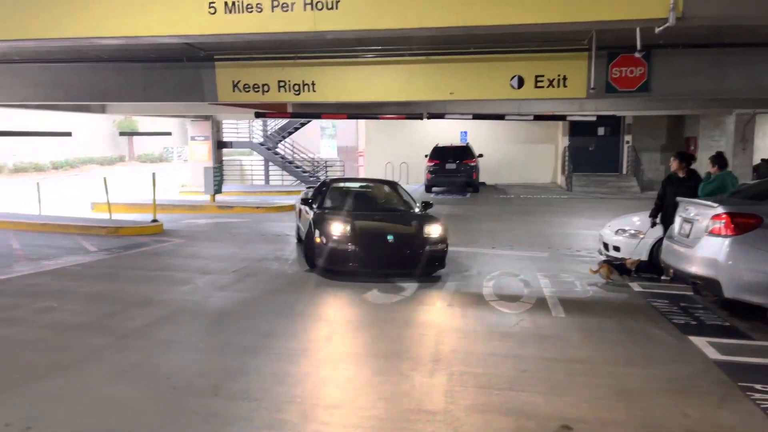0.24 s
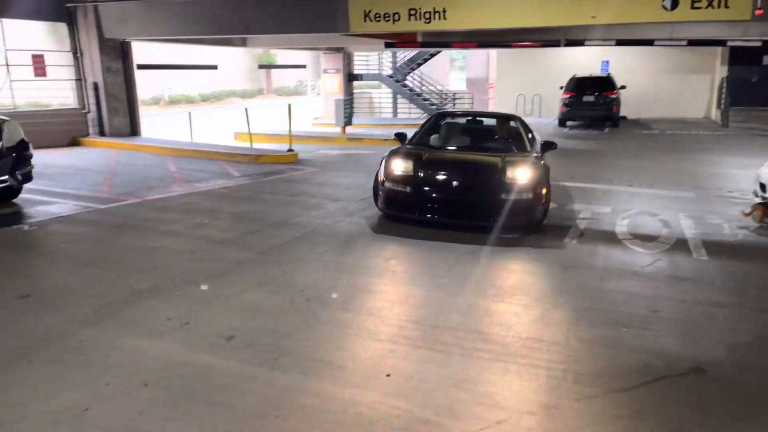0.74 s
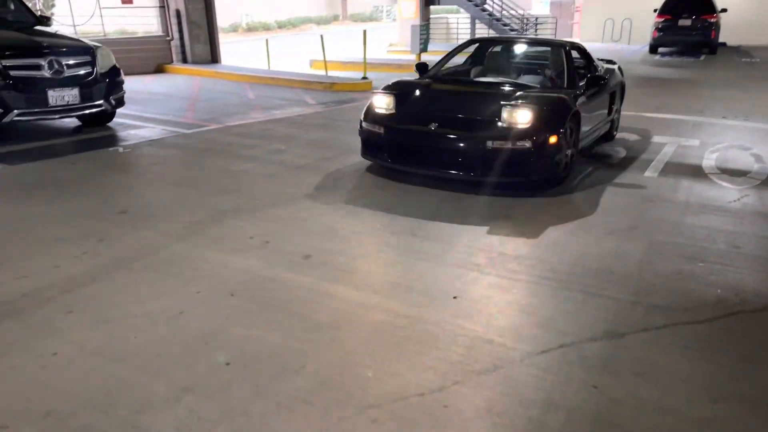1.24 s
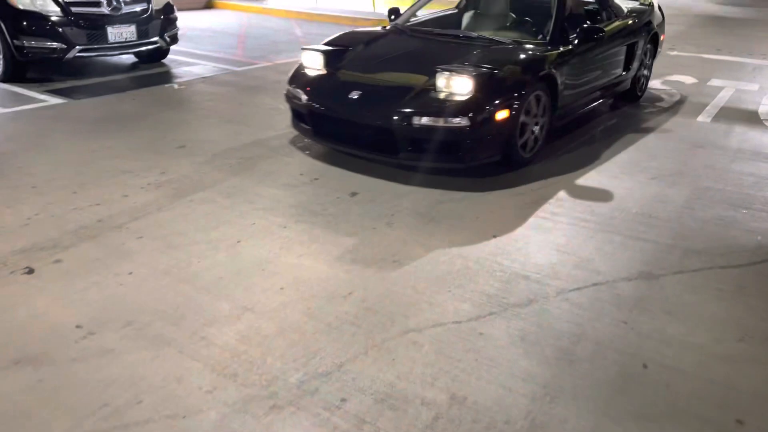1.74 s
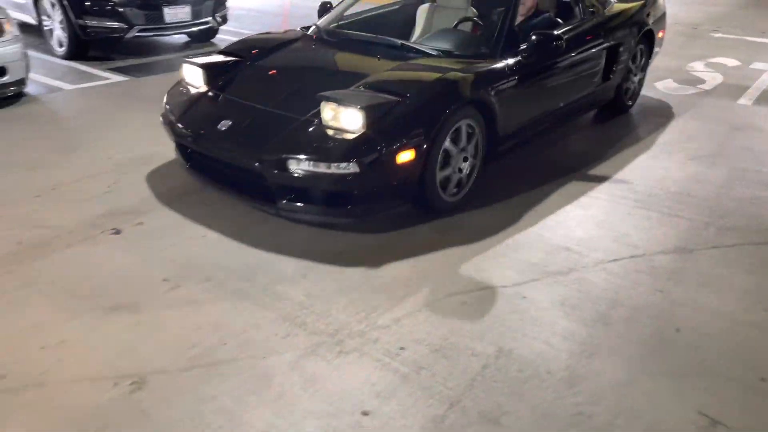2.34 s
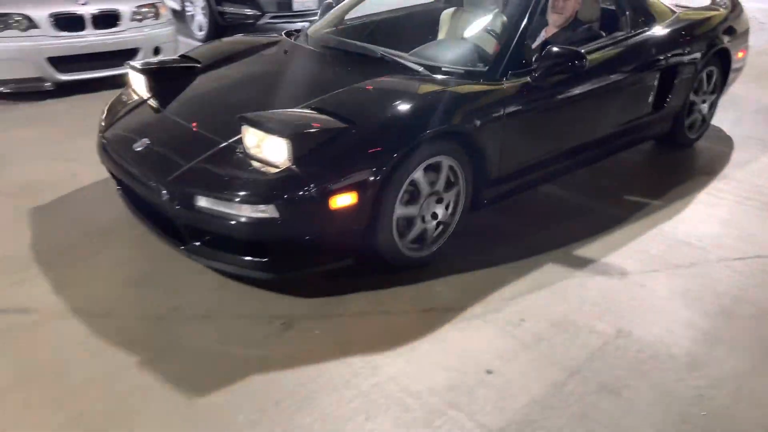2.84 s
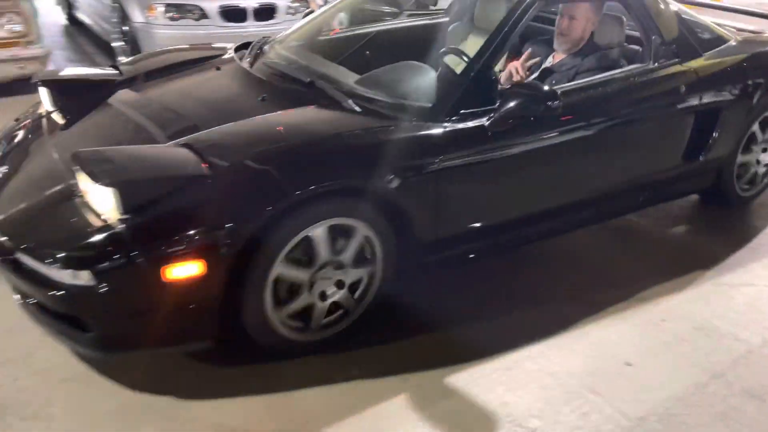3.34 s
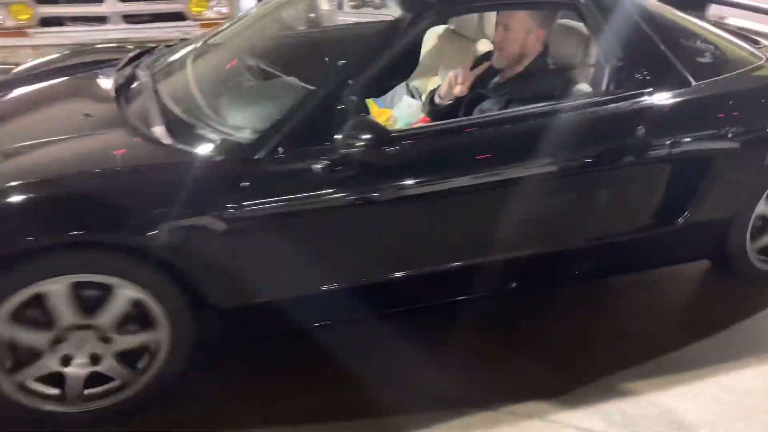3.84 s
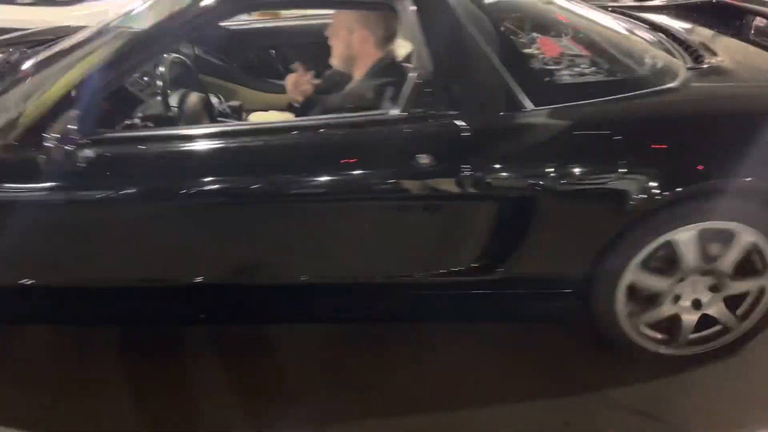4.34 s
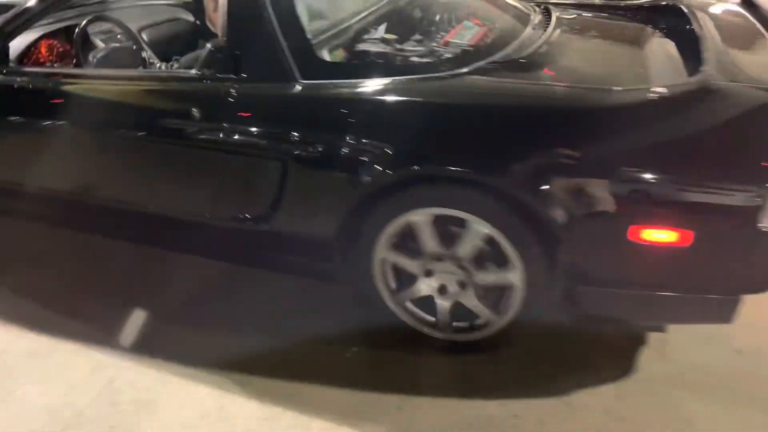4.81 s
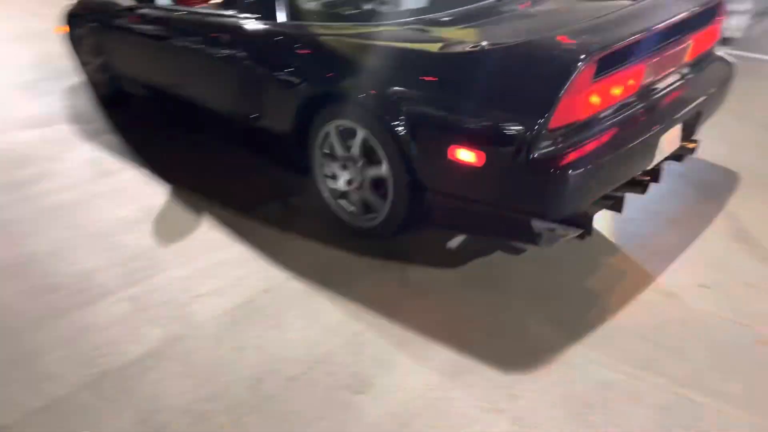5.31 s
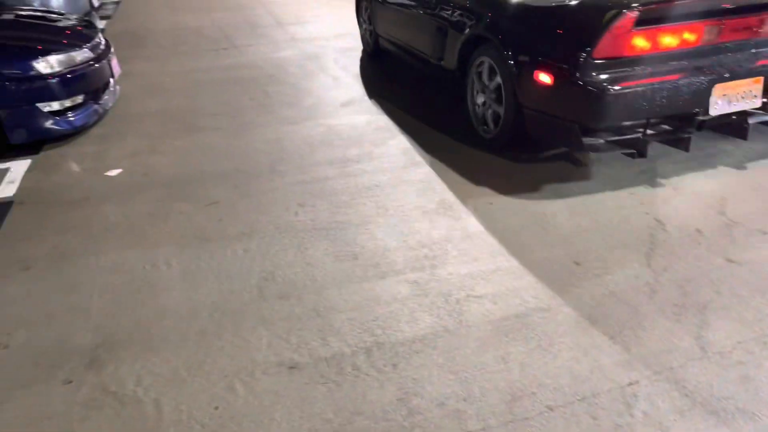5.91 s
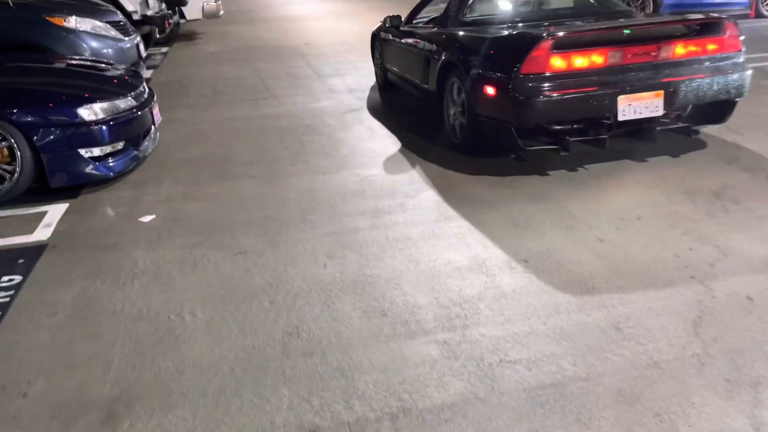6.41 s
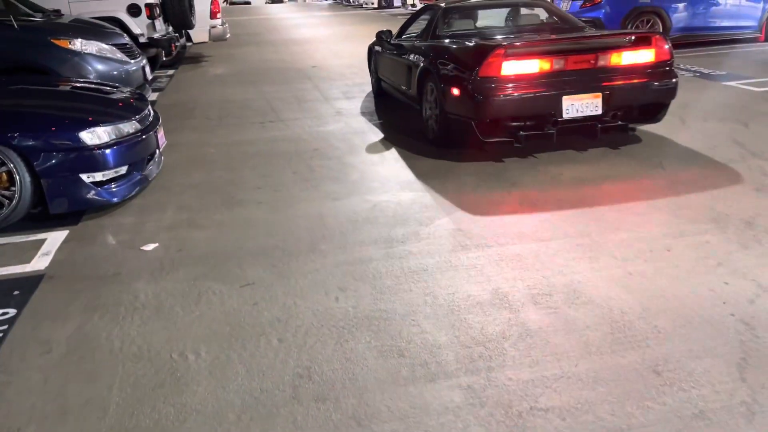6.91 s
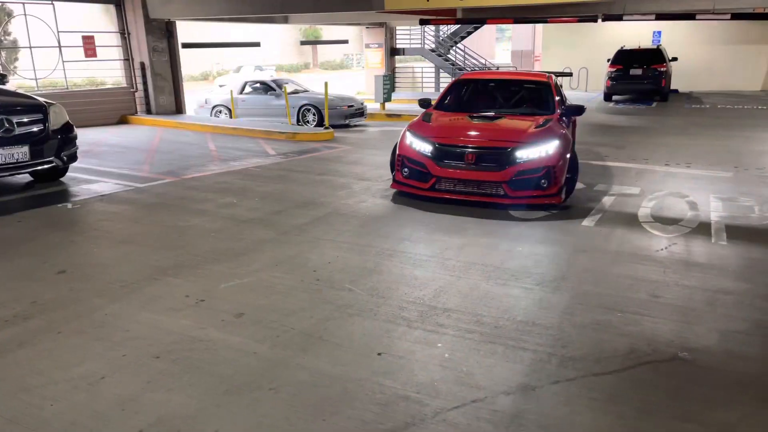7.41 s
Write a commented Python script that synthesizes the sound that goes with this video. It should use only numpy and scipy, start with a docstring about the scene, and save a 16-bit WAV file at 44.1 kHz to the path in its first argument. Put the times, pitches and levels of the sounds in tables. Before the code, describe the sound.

In a concrete parking garage, several engines idle with a low wavering drone. A dull scuff sounds far off early on. A sports car creeps closer, its deep exhaust swelling beside the microphone, tyres hissing softly, then throbs harder as it pulls away. The sound snaps off with a click, and after a tiny gap a second, fainter engine fades in.

```python
"""Concrete parking garage: a low sports car rolls slowly past while parked engines idle all around.
Sine notes drone and surge in the bass; uneven firings knock on pipe resonances and fill the garage.
Banded noise makes the roar and hiss of engine, tyres and air, and a dull scuff sounds far off early on.
Near the end the sound breaks off with a click; after a short silence a second car fades in, fainter,
with broad noise resonances in its roar."""
import sys
import numpy as np
from scipy import signal
from scipy.fft import rfft, irfft, next_fast_len
from scipy.io import wavfile

SR = 44100
rng = np.random.default_rng(int(sys.argv[2]) if len(sys.argv) > 2 else 0)


def int16_out(signal):
    """Quantize to a 16-bit WAV file."""
    q = np.round(np.clip(np.atleast_2d(signal).T, -1, 1) * 32767)
    wavfile.write(sys.argv[1], SR, q.astype(np.int16))


N = 337806
T = np.arange(N) / SR


def from_db(db):
    """Decibels to gain."""
    return 10 ** (np.asarray(db) / 20)


def rms_one(x):
    """Scale to unit rms."""
    return x / np.sqrt(np.mean(x ** 2) + 1e-20)


def in_time(rows):
    """Draw every column of a breakpoint curve, sample by sample."""
    s, *columns = np.transpose(rows)
    return [np.interp(T, s, c) for c in columns]


def at_hz(points, hz):
    """Read a spectrum on a log-frequency axis."""
    table_hz, level_db = np.array(points).T
    return np.interp(np.log(hz), np.log(table_hz), level_db)


def drift(rate):
    """Smooth random modulation with rms 1, about rate changes a second."""
    step = 40  # samples between the points of the slow curve
    r = np.exp(-2 * np.pi * rate * step / SR)
    slow = signal.lfilter([1], [1, -2 * r, r * r], rng.standard_normal(N // step + 2002))
    slow = rms_one(slow[2000:])  # leave out the filter's settling
    return np.interp(np.arange(N) / step, np.arange(len(slow)), slow)


def tone(hz, db):
    """A sine of given rms level that follows its pitch, from a random phase."""
    cycles = np.cumsum(hz) / SR + rng.random()
    return np.sqrt(2) * from_db(db) * np.sin(2 * np.pi * cycles)


def resonance(x, hz, width):
    """Two-pole resonance, gain 1 at its peak."""
    r = np.exp(-np.pi * width / SR)
    poles = [1, -2 * r * np.cos(2 * np.pi * hz / SR), r * r]
    return signal.lfilter([(1 - r * r) / 2, 0, (r * r - 1) / 2], poles, x + 1e-18)


# Stereo balance of the exhausts: one row each for left and right [gain]
BASS_LEAN = np.array([[1.05], [.95]])


def ports(note):
    """Reflections give a note a slightly different phase left and right: the left lag drifts."""
    lag = np.round(15 + 7 * drift(1.9)).astype(int)  # samples
    left = note[np.clip(np.arange(N) - lag, 0, N - 1)]
    return [left, note] * BASS_LEAN


OVERTONE_DB = -24    # octave, relative to its note
WAVER_AT_HZ = 130    # flutter is scaled by pitch relative to this


def order(hz, db, flutter_hz, flutter_db):
    """One engine order with a faint octave above it; higher notes flutter more."""
    share = hz / WAVER_AT_HZ
    hz = hz + share * flutter_hz
    db = db + share * flutter_db
    return tone(hz, db) + tone(2 * hz, db + OVERTONE_DB)


# Steady hum of a parked engine: f/Hz, level/dB before fade and waver
HUM = [(203.5, -39.5), (267.5, -42.5)]
# Fade of the hum, down while the car is close: t/s, level/dB
HUM_FADE = [(0, 1), (2.6, -1), (3.5, -9), (7.66, 0)]


def hum():
    """Idling sine lines whose pitch and level waver a little."""
    fade_db, = in_time(HUM_FADE)
    return sum(tone(hz + .8 * drift(4), db + fade_db + 2.4 * drift(7)) for hz, db in HUM)


# Steady exhaust notes of the engines around: f/Hz, level/dB before swell
DRONES = [(59, -35.5), (79, -36), (103, -35), (124, -37), (147, -36), (177, -41.5)]
DRONE_FOLLOWS = 0.25                          # share of the throb's level swing, in dB
SWELL_DB, SWELLS_PER_S, WANDER_HZ = 3, 3, 0.889   # rms swell, its rate, rms pitch drift


def drones(throb_db):
    """Exhaust sines that swell at random, drift in pitch and partly follow the throb."""
    out = np.zeros((2, N))
    swing_db = DRONE_FOLLOWS * (throb_db - throb_db.mean())
    for hz, db in DRONES:
        level_db = db + swing_db + SWELL_DB * drift(SWELLS_PER_S)
        out += ports(tone(hz + WANDER_HZ * drift(1.11), level_db))
    return out


THUD_S, THUD_RISE_S = .925, .004   # onset, rise time constant
# Bands of the dull scuff far off: lower f/Hz, upper f/Hz, noise level/dB before filtering, t60/s
THUD = [(300, 600, -19.5, 1.1), (600, 1200, -28.5, 1.0), (1500, 4300, -40.5, .5)]


def thud():
    """A dull burst of band-passed noise that dies away in the garage, the treble first."""
    out = np.zeros((2, N))
    age = np.maximum(T - THUD_S, 0)
    rise = 1 - np.exp(-age / THUD_RISE_S)
    for low_hz, high_hz, db, t60 in THUD:
        burst = rng.standard_normal((2, N)) * rise * from_db(db - 60 * age / t60)
        band = signal.butter(3, [low_hz, high_hz], "band", fs=SR, output="sos")
        out += signal.sosfilt(band, burst)
    return out


BREAK_S, RETURN_S = 7.0711, 7.131   # start and end of the silence
# Broad rings in the second car's roar: f/Hz, width/Hz of each of two passes, level/dB
SECOND_BODY = [(455, 30, -48), (786, 110, -50), (974, 50, -59)]


def second_car():
    """White noise coloured by a few broad resonances, heard only after the silence."""
    rings = np.zeros((2, N))
    for hz, width, db in SECOND_BODY:
        white = rng.standard_normal((2, N))
        ring = resonance(resonance(white, hz, width), hz, width)
        rings += from_db(db) * rms_one(ring)
    return rings * (T > RETURN_S)


# Brief pipe and tyre tones: start t/s, length/s, f/Hz, level/dB at the top of the arch, rms pitch spread/Hz
TONES = [(0, 1.0, 455.5, -46.5, 12), (0, .47, 290.7, -41.5, 5.3), (3.4, .58, 245.9, -41.5, 3.6),
         (3.9, .3, 282, -36, 4), (4.24, .45, 315, -33.5, 5), (4.45, .3, 203, -34, 3),
         (4.5, .24, 352, -40, 5), (4.6, .52, 410.5, -42.5, 12), (4.72, .45, 240, -39, 5),
         (4.83, .5, 323, -33.5, 5), (4.8, .62, 451, -37, 9), (5.26, .2, 294, -37, 4),
         (5.4, .4, 336, -38.5, 7), (5.45, .45, 446, -40.5, 9), (5.712, .064, 1446, -50, 10),
         (5.9, .61, 204.8, -36, 2.4), (6.17, .3, 286, -33, 5), (6.86, .24, 268.5, -28, 3),
         (7.03, .07, 1345, -44, 15), (6.13, .2, 208, -29, 3)]


def brief_tones(rough_db):
    """Sines that each swell and fade in one arch; the longer ones flutter more in level."""
    out = np.zeros(N)
    for start, length, hz, db, spread in TONES:
        arch = np.sin(np.pi * np.clip((T - start) / length, 0, 1))
        flutter_db = rough_db * min(2 * length, 1) * drift(30)
        out += arch * tone(hz + spread * drift(14.4), db + flutter_db)
    return out


# Spectrum of the garage roar, centre: f/Hz, relative level/dB per Hz
ROAR = [(12, -36), (25, -29), (38, -26.5), (48, -11), (86, -9.5), (134, -6), (227, -20), (460, -28.5),
        (540, -33), (1000, -39.5), (1400, -48), (2400, -48), (3650, -53), (4300, -58.5), (4900, -62.5),
        (7600, -58), (8300, -65.5), (8800, -81.5), (9500, -82), (10000, -68.5), (11800, -68.5),
        (13400, -73.5)]
# Spectrum of its left-minus-right part, before SIDE_DB: f/Hz, relative level/dB per Hz
ROAR_SIDE = [(20, -62.5), (36, -38.5), (48, -18), (138, -16.5), (233, -14), (327, -16.5), (524, -21),
             (1200, -30), (2890, -40), (5560, -50.5), (8240, -49), (10200, -56), (10900, -94.5),
             (13400, -85.5)]
# Stereo lean of the roar: f/Hz, left over right level/dB
LEAN = [(60, 1.9), (360, 1.5), (650, -1.5), (1180, 1), (2140, 5), (3880, 5), (7040, 0), (12800, 0)]
ROAR_DB, SIDE_DB = -7.5, -11.5   # roar over the mean throb curve; side trim


def roar(car_db, patchy_db):
    """Diffuse engine, tyre and air noise in half-octave bands; each follows the car and flickers."""
    size = next_fast_len(N)
    hz = np.arange(1, size // 2 + 2) * SR / size
    white = rfft(rng.standard_normal((2, size)))
    white *= from_db([at_hz(ROAR, hz), at_hz(ROAR_SIDE, hz) + SIDE_DB])
    white /= np.sqrt(2 * np.sum(np.abs(white[0]) ** 2)) / size  # centre to unit rms
    swings_db = np.array([v - np.mean(v) for v in car_db])
    out = np.zeros((2, N))
    together = drift(4.6)
    for centre in 20 * 2 ** np.arange(0, 10, .5):
        mask = np.cos(np.pi / 2 * np.clip(2 * np.log2(hz / centre), -1, 1)) ** 2
        mid, side = irfft(white * mask, size)[:, :N]
        # blend the two level curves whose home pitches lie around this band
        place = np.interp(np.log(centre), np.log([130, 330, 800, 2500, 8000]), np.arange(5))
        follow_db = np.clip(1 - np.abs(place - np.arange(5)), 0, 1) @ swings_db
        gain = from_db(follow_db + patchy_db * (0.4 * together + drift(26)))
        lean = from_db(at_hz(LEAN, centre) / 2 * np.array([[1], [-1]]))
        out += gain * np.array([mid + side, mid - side]) * lean
    return out * from_db(np.mean(car_db[0]) + ROAR_DB)


# Bass notes that surge and sink back: start t/s, length/s, start f/Hz, end f/Hz, level/dB before flutter
SURGES = [(-.15, 0.36, 146.5, 145.5, -24), (.18, 0.2, 77.7, 80, -25.5), (.38, 0.4, 122.8, 126.6, -27.5),
          (.46, .22, 78, 76, -31), (.6, .25, 128, 124, -28), (.9, 0.2, 52, 57, -28.5),
          (1.04, .24, 127, 130.6, -24), (1.17, 0.23, 59.4, 60.6, -31), (1.48, 0.15, 127, 125, -31.5),
          (1.52, .16, 103, 102, -29), (1.7, 0.24, 102.5, 102.3, -24.5), (.25, .4, 151, 150, -31),
          (2.02, .42, 145, 146, -25.5), (2.15, 0.4, 62.5, 61, -31.5), (2.61, .84, 59.5, 61.5, -19.5),
          (3.14, .18, 68, 68, -24), (2.3, .7, 178, 177, -36), (2.4, .3, 139, 139, -29),
          (2.66, 0.16, 123, 117.8, -26), (2.68, 0.19, 87.5, 90, -30), (2.8, 0.55, 138.5, 140.5, -21.5),
          (3.08, 0.31, 91.7, 97, -27), (3.2, 0.24, 108, 108, -26), (3.32, .26, 147, 147, -19.5),
          (3.53, 0.4, 146, 142.5, -14.5), (3.45, 0.44, 98.4, 94, -28), (3.66, .26, 47.4, 48, -26.5),
          (3.6, 0.28, 193, 194, -29), (4.2, 0.3, 112, 107, -25), (4.56, .34, 104, 104, -25),
          (4.08, .5, 127, 132, -23), (4.36, 0.7, 56, 58, -18.5), (5.02, .2, 58, 58, -27),
          (4.85, 0.41, 187.6, 182.4, -29.5), (4.96, 0.22, 128.5, 126.7, -18), (5.08, 0.28, 93, 91, -27.5),
          (5.34, .26, 129.5, 128, -13), (5.6, 0.48, 129.5, 123.5, -21.5), (5.76, .36, 82, 83, -26),
          (5.7, 0.99, 179, 177.4, -31.5), (5.8, 0.3, 65, 62.5, -24), (6.13, 0.2, 63.5, 65, -17),
          (6.36, 0.22, 67, 65, -15.5), (6.16, 0.5, 105, 109.5, -19), (6.66, .44, 106.5, 106, -20),
          (6.42, .26, 98, 98, -23), (6.16, 0.16, 120.7, 116.7, -22), (6.14, .42, 142.5, 130.5, -14.5),
          (6.5, .28, 138, 147, -16), (6.56, 0.36, 122, 120.5, -14.5), (6.84, .3, 120, 121.5, -18),
          (6.78, 0.28, 83.5, 82.5, -20), (6.62, 0.17, 69, 70, -20), (6.34, .16, 174, 180, -24),
          (6.6, .3, 198, 205, -30), (6.8, 0.2, 138, 139, -19), (6.92, .2, 149, 151, -23),
          (6.86, .3, 168, 167.3, -20), (7.15, 0.3, 126.5, 123, -27.5), (7.2, .16, 106, 106, -28),
          (7.2, 0.2, 166, 166.4, -29.5), (7.44, 0.3, 123.5, 123, -23)]
SURGE_EDGE, LONGEST_EDGE_S = 0.24, 0.091   # share of the length rising, and again falling; its limit


def surges(waver_hz, waver_db):
    """Gliding engine orders rise out of the rumble; four voices share their flutter."""
    wavers = [(waver_hz * drift(10.0), waver_db * drift(20)) for _ in range(4)]
    voices = np.zeros((4, N))
    for k, (start, length, from_hz, to_hz, db) in enumerate(SURGES):
        part = (T - start) / length
        on = (part > 0) & (part < 1)
        part = part[on]
        edge = min(SURGE_EDGE, LONGEST_EDGE_S / length)
        shape = np.sin(np.pi / 2 * np.clip(np.minimum(part, 1 - part) / edge, 0, 1)) ** 2
        flutter_hz, flutter_db = wavers[k % 4]
        glide_hz = from_hz + (to_hz - from_hz) * part
        voices[k % 4, on] += shape * order(glide_hz, db, flutter_hz[on], flutter_db[on])
    return sum(ports(voice) for voice in voices)


# Firing note of the passing car, climbing as it draws level, then wavering: t/s, f/Hz, level/dB
FIRING = [(3.05, 120.9, -45), (3.3, 121.2, -18.5), (3.5, 123.7, -22), (3.62, 124.8, -15),
          (3.8, 127.4, -19.5), (3.96, 130.1, -8.5), (4.2, 136.1, -16.5), (4.44, 141.8, -21.5),
          (4.62, 146.9, -21), (4.8, 144.5, -16.5), (4.95, 144, -17), (5.07, 145.7, -23), (5.19, 142.9, -16),
          (5.4, 141.2, -19.5), (5.6, 140.4, -31), (5.8, 143, -33), (6.0, 147.2, -27), (6.12, 145.6, -32)]
LOPE_CYCLES = 13.5                         # mean firing cycles per lope
LOPE_DB, LOPE_HZ = 3.5, 1.8                # swing in level and pitch for a note at WAVER_AT_HZ
LOPE_FROM_S, LOPE_GROWS_S = 4.2, .25       # onset, time to full depth


def firing_note(waver_hz, waver_db):
    """The passing car's firing rate as a near-sine; uneven cylinders make it lope."""
    hz, level_db = in_time(FIRING)
    heard = (T > FIRING[0][0]) & (T < FIRING[-1][0])
    lopes_per_s = hz / LOPE_CYCLES * (1 + .1 * drift(5))
    turn = 2 * np.pi * np.cumsum(lopes_per_s) / SR
    lope = np.clip((T - LOPE_FROM_S) / LOPE_GROWS_S, 0, 1)
    flutter_hz = waver_hz * drift(10.0) + lope * LOPE_HZ * np.sin(turn)
    flutter_db = waver_db * drift(16) + lope * LOPE_DB * np.cos(turn)
    return ports(heard * order(hz, level_db, flutter_hz, flutter_db))


GARAGE_T60_S, GARAGE_DB = 1.2, -1.5   # decay time, gain of the reverberation


def garage(x):
    """Dense concrete reverberation: a decaying noise tail for each side."""
    age = np.arange(int(GARAGE_T60_S * SR)) / SR
    tails = rng.standard_normal((2, len(age))) * from_db(-60 * age / GARAGE_T60_S)
    tails /= np.sqrt(np.sum(tails ** 2, axis=1, keepdims=True))
    return signal.fftconvolve(x[None], tails, axes=1)[:, :N]


# Exhaust pipe resonances: f/Hz, width/Hz of each of two passes, relative level/dB
PIPES = [(66.3, 11, -10), (130.5, 34, 1.5), (152, 16, -18), (288, 88, -14.5), (463, 36, -24.5)]
FIRINGS_PER_S, THROB_DB = 40, -13.0   # rate before jitter; trim of the throb curve


def throb(per_s, level_db, jitter, uneven_db):
    """Uneven firings knock on the exhaust pipe resonances, then fill the garage."""
    rate = per_s * np.abs(1 + jitter * drift(25))
    fired = np.diff(np.floor(np.cumsum(rate) / SR), prepend=0) > 0
    knocks = fired * from_db(uneven_db * rng.standard_normal(N))
    pipe = np.zeros(N)
    for k, (hz, width, db) in enumerate(PIPES):
        ring = resonance(resonance(knocks, hz, width), hz, width)
        pipe += (-1) ** k * from_db(db) * ring  # alternate polarity
    return from_db(level_db) * rms_one(pipe + from_db(GARAGE_DB) * garage(pipe))


SWING_S = .004                               # length of the last bass swing
SWING_DEPTH = np.array([[-.15], [-.25]])     # left and right height it reaches
RETURN_FADE_S = 0.023


def break_off(mix):
    """The sound stops in mid bass swing, which clicks; after the silence it fades in again."""
    swing = np.clip(1 - (BREAK_S - T) / SWING_S, 0, 1) ** 2
    before = mix * (1 - swing) + swing * SWING_DEPTH
    after = mix * np.clip((T - RETURN_S) / RETURN_FADE_S, 0, 1)
    return np.where(T < BREAK_S, before, after)


# Level curves of the passing car, then of the second, before trims:
# t/s, throb level/dB, growl level/dB, tyre hiss level/dB
CAR = [(0.0, -20.5, -30.5, -50.5), (.3, -21, -35, -54.5), (.75, -24, -33, -53), (1.5, -22.5, -36.5, -53),
       (2.5, -24.5, -39, -52), (2.75, -13.5, -41, -52), (3.1, -16, -37.5, -52), (3.75, -14, -31, -50.5),
       (4.1, -15.5, -27.5, -49), (4.27, -14.5, -29.5, -47.5), (4.5, -13.5, -27.5, -45.5),
       (4.9, -15, -27.5, -47.5), (5.75, -16.5, -28.5, -47), (6.1, -16, -34.5, -47.5), (6.2, -7, -32, -45.5),
       (6.35, -10.5, -30, -44.5), (6.5, -12, -30.5, -46), (7.06, -13, -31.5, -45), (7.15, -22.5, -37, -52),
       (7.3, -21, -39, -53), (7.66, -18.5, -38.5, -55)]
BODY_HISS, BODY_THROB = 0.51, 0.12   # body roar's shares of the hiss and throb swings, in dB
FINE_HISS, FINE_THROB = 1, 0.24      # the same for fine hiss


def scene():
    """All engines together, with the short silence before the second car."""
    throb_db, growl_db, hiss_db = in_time(CAR)
    body_db = BODY_HISS * hiss_db + BODY_THROB * throb_db
    fine_db = FINE_HISS * hiss_db + FINE_THROB * throb_db
    around = hum() + drones(throb_db) + thud() + second_car()
    noise = roar([throb_db, growl_db, body_db, hiss_db, fine_db], patchy_db=1.17)
    notes = surges(waver_hz=.9, waver_db=1.8) + firing_note(waver_hz=.9, waver_db=1.8)
    exhaust = throb(FIRINGS_PER_S, throb_db + THROB_DB, jitter=.3, uneven_db=1.5) * BASS_LEAN
    return break_off(around + brief_tones(rough_db=2.5) + noise + notes + exhaust)


CUTOFF_HZ = 13700   # 60 dB down from here up


def record(dry):
    """A soft 4 ms start; peaks are rounded, the top is cut."""
    dry = dry * np.clip(T / .004, 0, 1)
    rounded = .98 * np.tanh(dry / .96)
    return signal.sosfilt(signal.cheby2(12, 60, CUTOFF_HZ, fs=SR, output="sos"), rounded)


dry = scene()
out = record(dry)
int16_out(out)
```